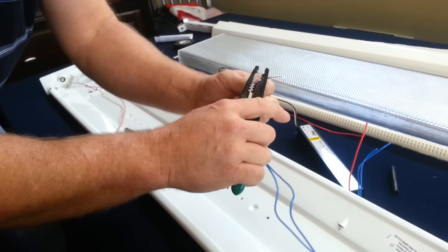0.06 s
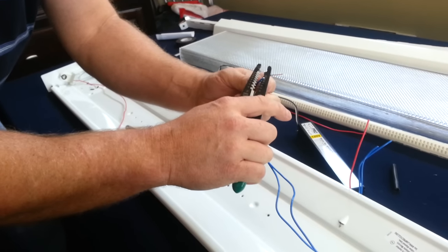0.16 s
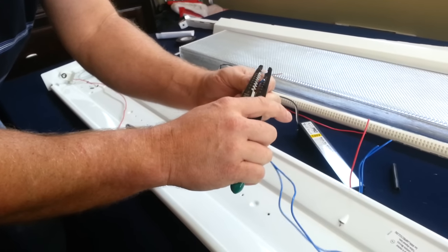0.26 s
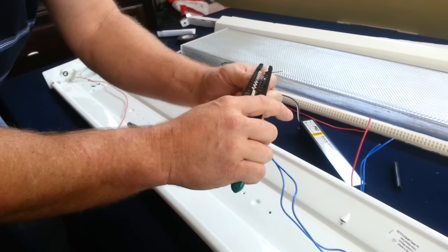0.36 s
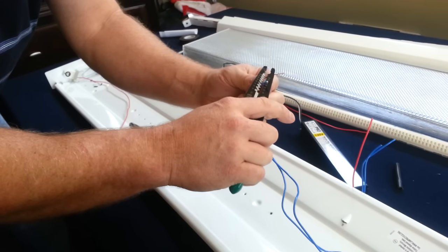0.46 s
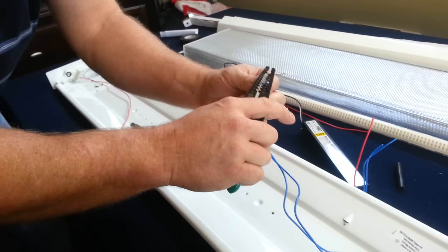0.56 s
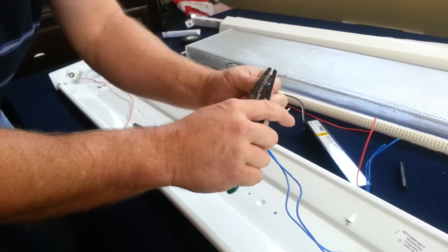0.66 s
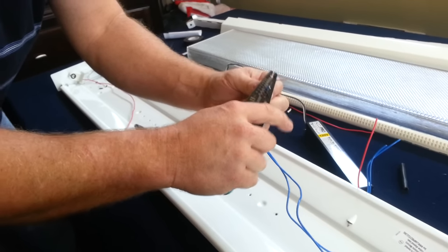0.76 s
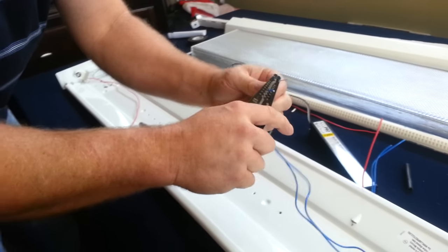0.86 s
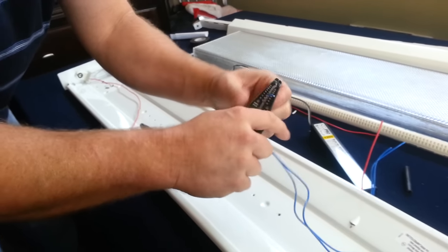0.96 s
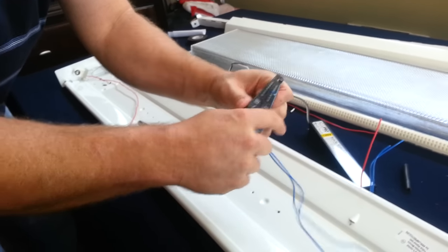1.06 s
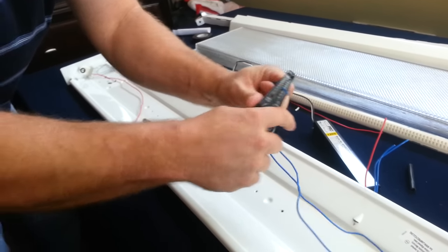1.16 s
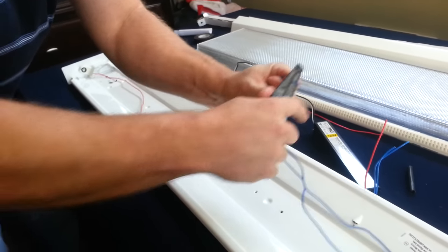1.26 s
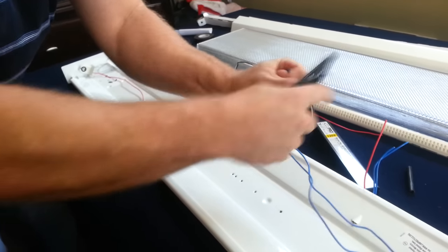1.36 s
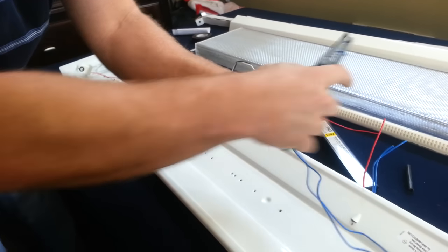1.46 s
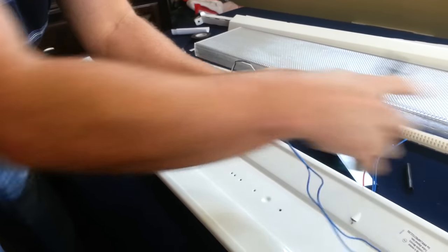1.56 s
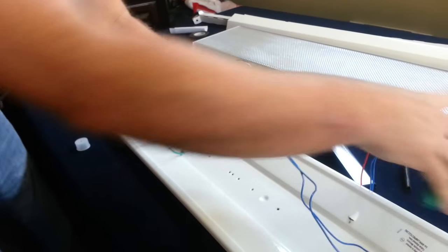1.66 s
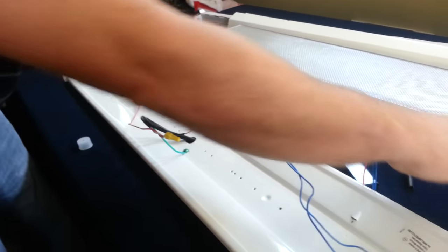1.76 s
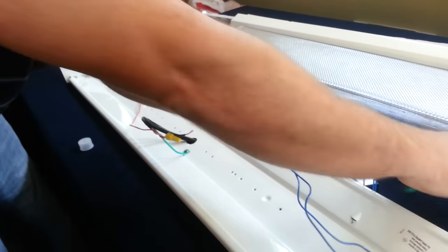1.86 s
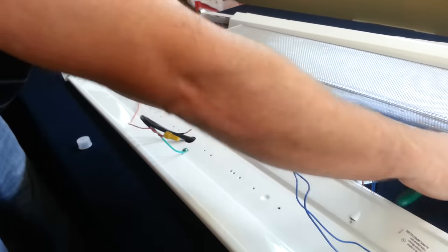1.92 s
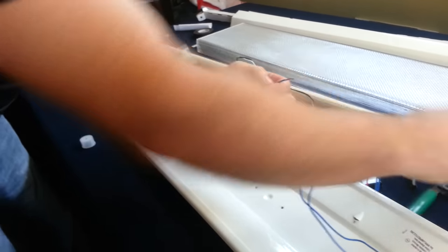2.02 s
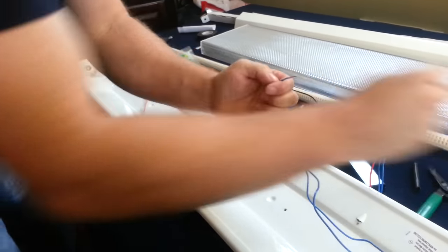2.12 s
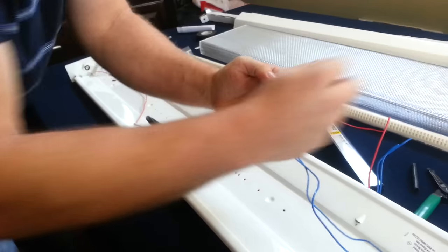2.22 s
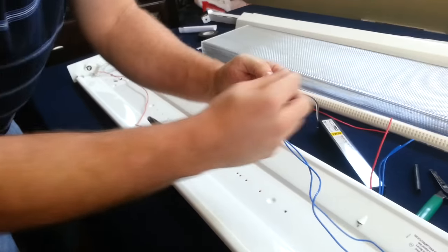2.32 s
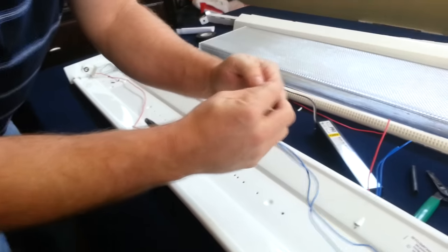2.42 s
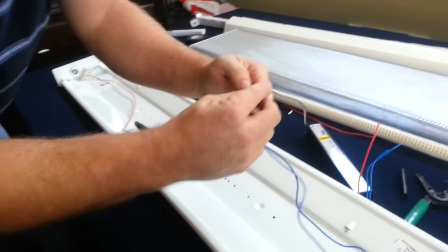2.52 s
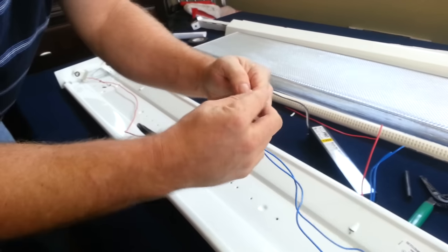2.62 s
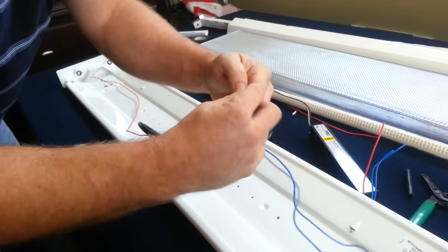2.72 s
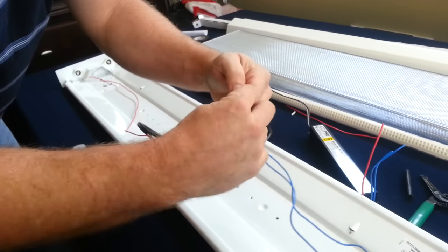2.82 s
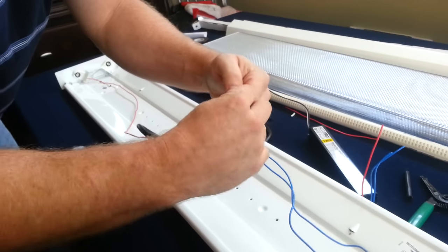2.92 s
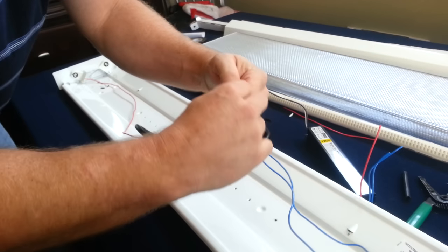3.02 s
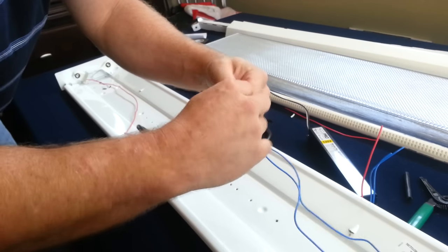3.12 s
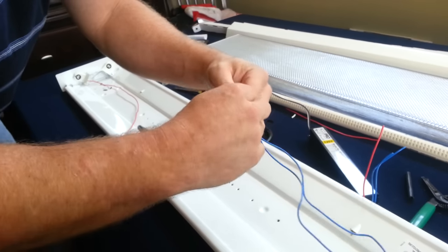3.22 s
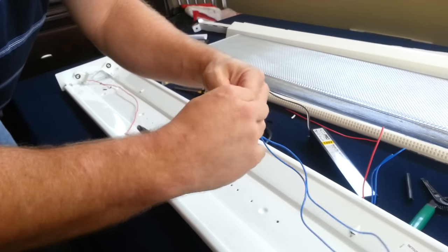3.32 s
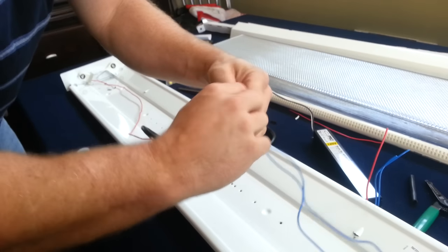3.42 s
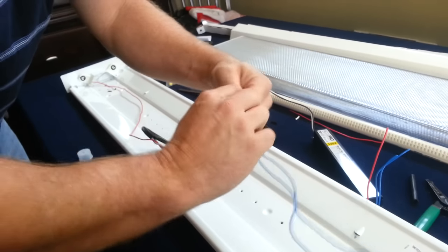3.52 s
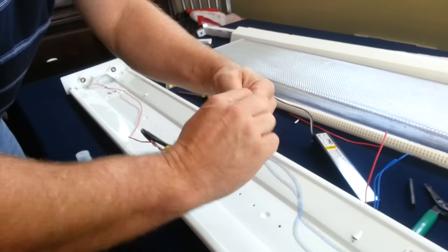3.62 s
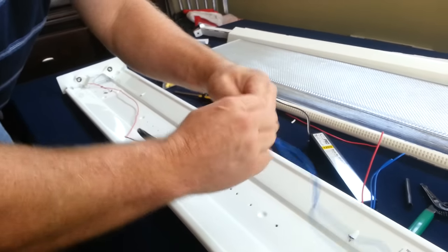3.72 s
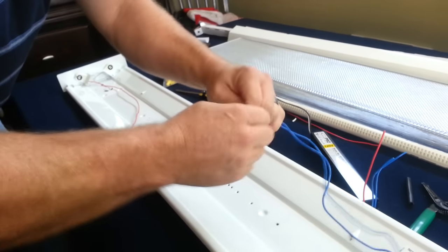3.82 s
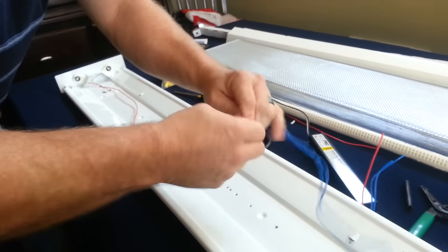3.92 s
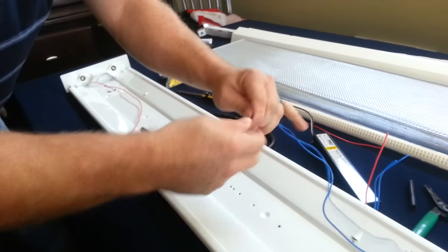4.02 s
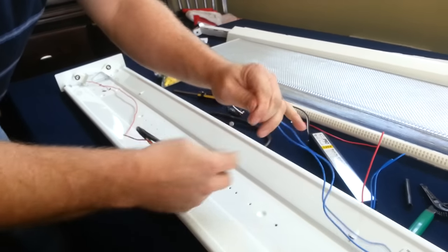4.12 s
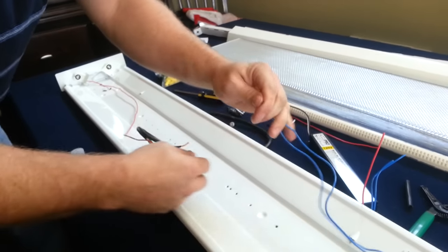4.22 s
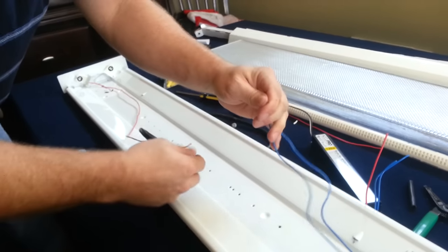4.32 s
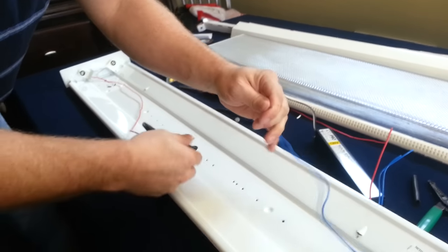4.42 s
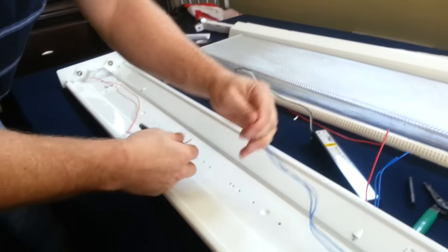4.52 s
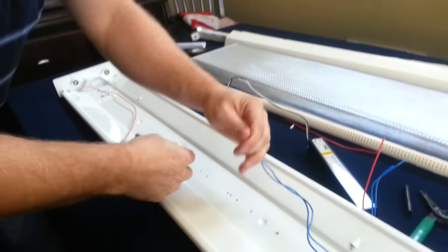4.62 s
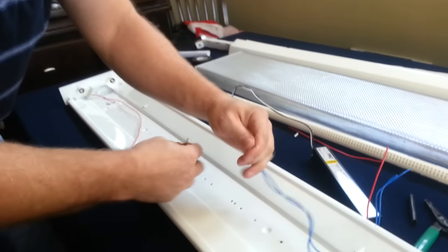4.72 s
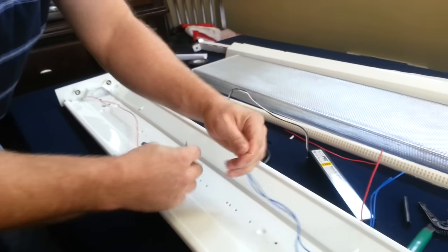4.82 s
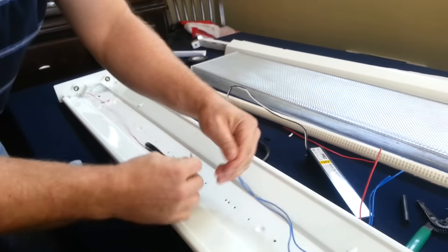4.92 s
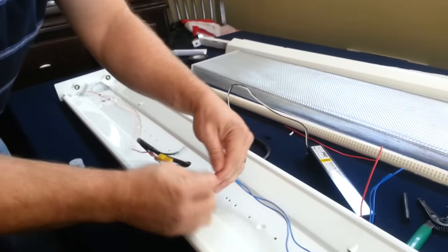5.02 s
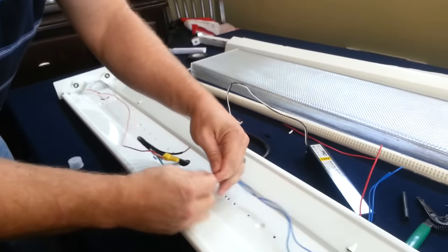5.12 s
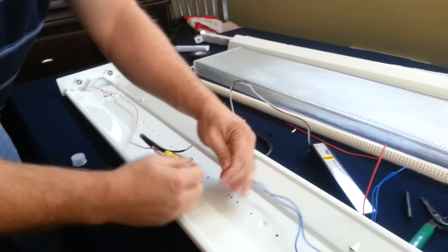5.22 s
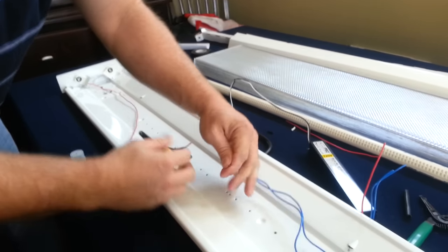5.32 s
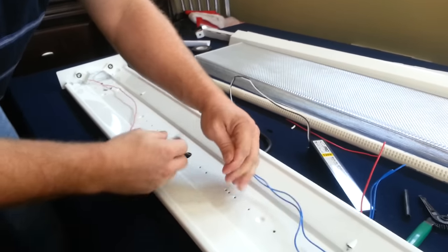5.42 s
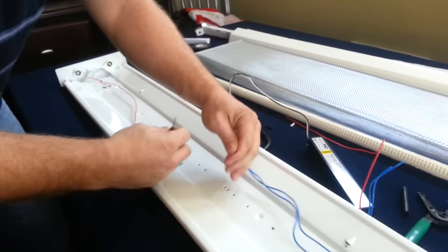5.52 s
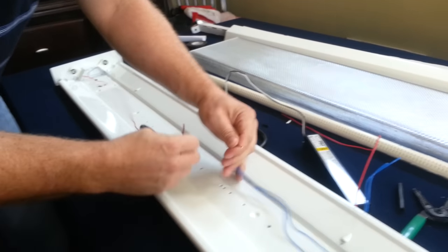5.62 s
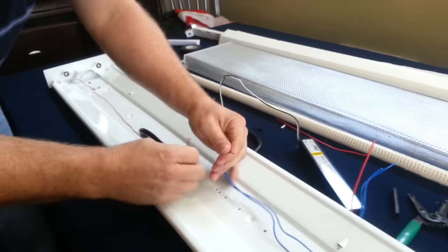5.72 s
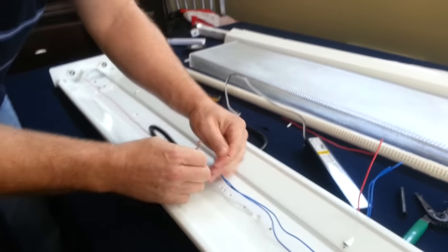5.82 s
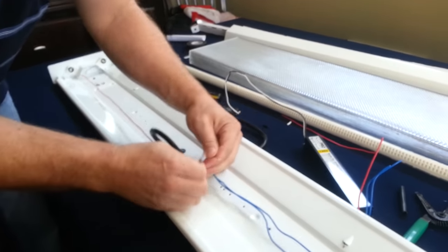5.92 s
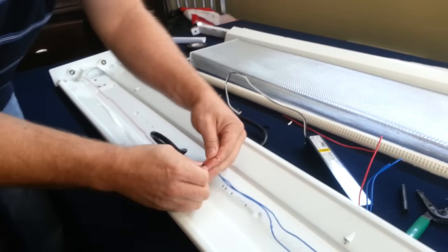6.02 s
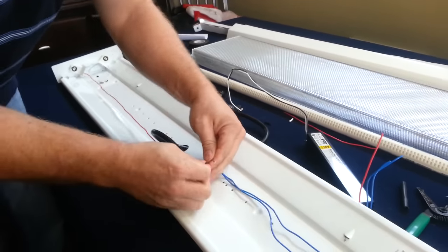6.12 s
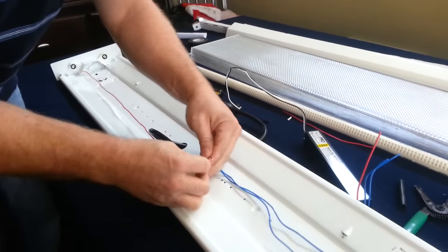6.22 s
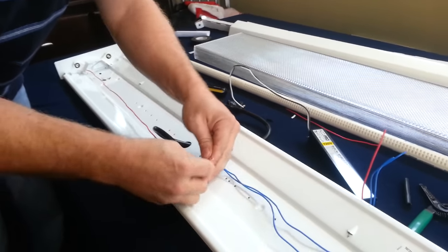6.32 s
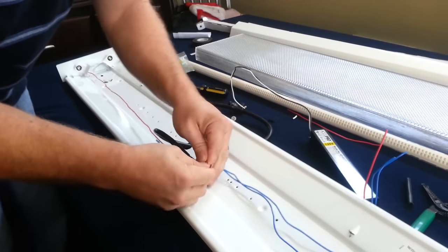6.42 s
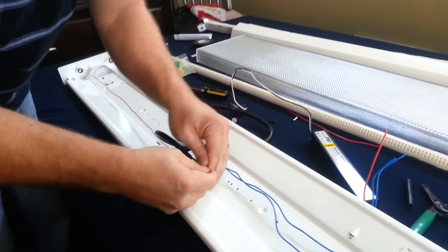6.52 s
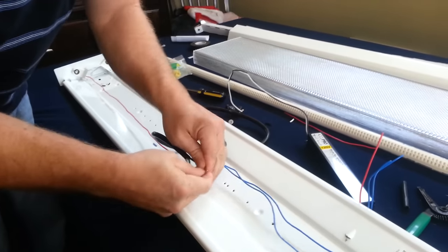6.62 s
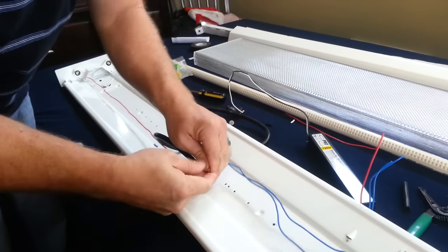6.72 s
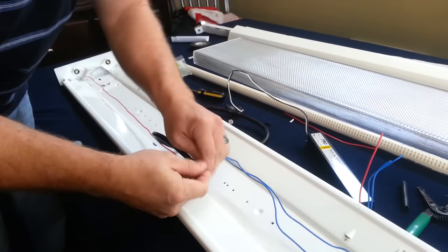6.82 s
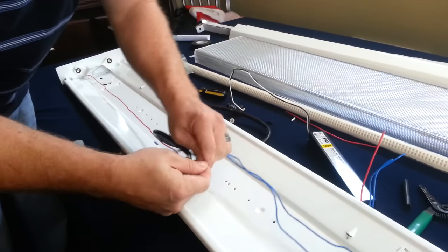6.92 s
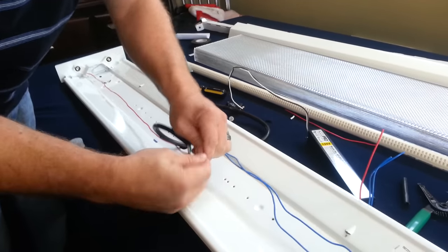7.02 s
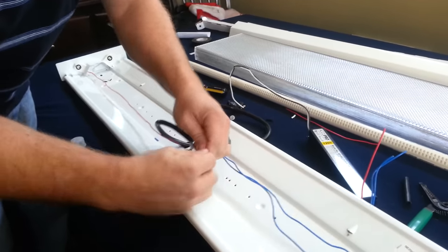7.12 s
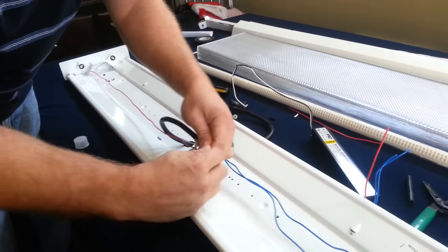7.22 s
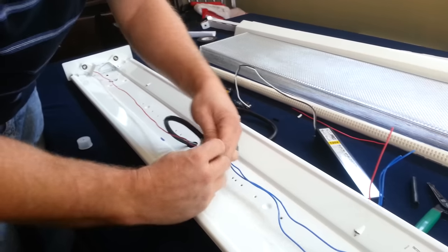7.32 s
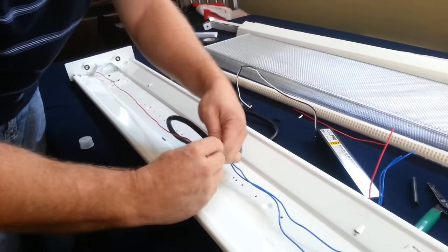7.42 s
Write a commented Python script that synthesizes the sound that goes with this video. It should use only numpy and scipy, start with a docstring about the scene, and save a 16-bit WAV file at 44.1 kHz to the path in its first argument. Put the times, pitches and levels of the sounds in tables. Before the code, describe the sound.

Wire strippers tick and snap, then drop with a loud ringing clang into a sheet-metal fixture, followed by wire taps and rustling hands in a quiet room.

```python
"""Wire taps and scuffs, in the hand during stripping, over room noise, a mains hum and rustling hands.
A steel wire stripper ticks and its jaws snap; it drops into an open sheet-metal light fixture, which rings.
Two faint thin whistles follow, one falling, one level and breathy; then wire taps and finger knocks on a plate.
Blows are a noise crack plus a banded noise ring; jaws and housing add decaying sine modes; fingers
drive a damped low resonance; whistles are gliding sines; rustle and room are shaped band noise."""
import sys
import numpy as np
from scipy import signal
from scipy.fft import rfft, irfft
from scipy.io import wavfile
from scipy.ndimage import uniform_filter1d

SR = 44100
rng = np.random.default_rng(int(sys.argv[2]) if len(sys.argv) > 2 else 0)


def write(x):
    x = np.atleast_2d(x).T
    wavfile.write(sys.argv[1], SR, np.round(np.clip(x, -1, 1) * 32767).astype(np.int16))

N = 329257  # samples

SIDES = np.array([[1], [-1]])  # left, right


def from_db(db):
    """Decibels to gain."""
    return 10 ** (np.asarray(db) / 20)


def rms_one(x):
    """Scale to rms 1."""
    return x / np.sqrt(np.mean(x ** 2) + 1e-20)


def at_hz(points, hz):
    """Interpolate a (f/Hz, value) table on a log-frequency axis."""
    table = np.array(points)
    return np.interp(np.log(hz), np.log(table[:, 0]), table[:, 1])


def drift(rate_hz):
    """Slow random wander of rms 1: twice-smoothed noise, computed at SR / 40."""
    r = np.exp(-80 * np.pi * rate_hz / SR)
    white = rng.standard_normal(N // 40 + 2002)
    slow = signal.lfilter([1], [1, -2 * r, r * r], white)[2000:]
    return np.interp(np.arange(N) / 40, np.arange(len(slow)), rms_one(slow))


def resonance(x, hz, width_hz):
    """Two-pole resonance, gain 1 on top."""
    r = np.exp(-np.pi * width_hz / SR)
    zeros = np.array([1, 0, -1]) * (1 - r * r) / 2
    poles = [1, -2 * r * np.cos(2 * np.pi * hz / SR), r * r]
    return signal.lfilter(zeros, poles, x)


# third-octave centres
BANDS_HZ = 26 * 2 ** (np.arange(28) / 3)


def noise_bank(size, likeness, balance, humps=(), lines_db=0):
    """Stereo noise in third-octave bands (bands x 2 x size), with spectral humps and a crowd of close lines."""
    hz = np.arange(size // 2 + 1) * SR / size
    crowd = uniform_filter1d(rng.standard_normal(len(hz)), size=max(1, 12 * size // SR))
    shape = from_db(lines_db * rms_one(crowd))
    for centre, width, db in humps:
        shape = shape * (1 + 1.37 * from_db(db) / (1 + (2 * (hz - centre) / width) ** 2))
    spectra = rfft(rng.standard_normal((2, 2, size))) * rms_one(shape)
    sources = irfft(spectra, size)
    bank = []
    for k, centre in enumerate(BANDS_HZ):
        edges = centre * 2 ** np.array([-1 / 6, 1 / 6])
        band_pass = signal.butter(2, edges, "band", fs=SR, output="sos")
        mid, side = signal.sosfilt(band_pass, sources[k % 2])  # neighbouring bands use different noise
        alike = np.clip(at_hz(likeness, centre), -1, 1)
        stereo = np.sqrt(1 + alike) * mid + np.sqrt(1 - alike) * side * SIDES
        bank.append(stereo * from_db(at_hz(balance, centre) / 2 * SIDES))
    return np.array(bank, dtype=np.float32)


def band_gains(colour, brightness_db=0, body_db=0):
    """Band gains for rms 1 before tilt; a hard contact tilts the treble up, a heavy one fills in the body."""
    gains = from_db(at_hz(colour, BANDS_HZ))
    total = np.sqrt(np.sum(gains ** 2 * BANDS_HZ) * .46 / SR)
    treble = brightness_db * np.log2(np.maximum(BANDS_HZ, 2500) / 4000)
    body = body_db / (1 + (BANDS_HZ / 2300) ** 4) / (1 + (480 / BANDS_HZ) ** 4)
    return gains / total * from_db(treble + body)


# ring decay: f/Hz, t60 / object's t60
DECAY_RATIO = [(100, 1.5), (400, 1.4), (1000, 1.25), (3000, 1.05), (6000, .84), (14000, .52)]
# a glancing scuff has more ring than crack and swells more slowly
SWELL_DB_PER_DB, USUAL_RING_DB = 0.9, -11


def blows(events, shared, colour, bank, crack_s, delay_s, spread_db, rattle_db):
    """Each blow: a short crack, then a dense, rattling ring that swells and dies band by band."""
    pan_db, favour_db, t60_s, swell_s = shared
    crack_len = 600
    size = int(np.clip(1.2 * t60_s, .05, 1) * SR)
    out = np.zeros((2, N + SR))
    t = np.arange(size, dtype=np.float32) / SR
    late = np.maximum(t - delay_s, 0)
    band_t60_s = t60_s * at_hz(DECAY_RATIO, BANDS_HZ)[:, None]
    dying = np.exp(-np.log(1000) / band_t60_s * late).astype(np.float32)
    edge = t[:crack_len] / crack_s
    crack_envelope = np.minimum(1, 4 * edge) * np.exp(-edge)
    chance = rng.standard_normal((len(events), len(BANDS_HZ) + 1))
    # loose parts chatter while the metal shakes
    rattle = np.append(from_db(rattle_db * drift(48)), np.ones(SR))

    for (s, peak_db, body_db, brightness_db, hz, ring_db), draw in zip(events, chance):
        at = round(s * SR)
        slower = from_db(SWELL_DB_PER_DB * max(ring_db - USUAL_RING_DB, 0))
        swell = 1 - np.exp(-late / (max(swell_s, 1e-4) * slower))
        gains = band_gains(colour, brightness_db, body_db) * from_db(spread_db * draw[1:])
        gains = gains.astype(np.float32)
        start = int(abs(draw[0]) * 1e6) % (bank.shape[2] - size)
        noise = bank[:, :, start:start + size]
        ring = np.einsum("bt,bct->ct", gains[:, None] * dying, noise)
        ring = from_db(ring_db) * swell * rattle[at:at + size] * ring
        # straight path: same crack wave in both ears
        crack = crack_envelope * (gains @ noise[:, 0, :crack_len])
        # the spot struck favours one group of modes
        width_hz = 0.055 * hz
        ring = ring + from_db(favour_db) * resonance(ring, hz, width_hz)
        crack = crack + from_db(favour_db) * resonance(crack, hz, width_hz)
        ring[:, :crack_len] += .7 * crack / np.abs(crack).max()
        out[:, at:at + size] += from_db(peak_db + pan_db / 2 * SIDES) * ring
    high_pass = signal.butter(4, 135, "high", fs=SR, output="sos")
    return signal.sosfilt(high_pass, out[:, :N] + 1e-18)


def rings(events, modes, modes_db, pan_db, lag_s):
    """Clear modes of a struck object: decaying sines, their phase delayed by lag_s in the left ear."""
    length_s = np.clip(max(mode[2] for mode in modes), .02, 1.5)
    t = np.arange(int(length_s * SR)) / SR
    out = np.zeros((2, N + 2 * SR))
    hz, level_db, t60_s = np.transpose(modes)[:, :, None]
    fading = from_db(level_db + modes_db - 60 * t / t60_s) * np.minimum(1, t / .0004)
    tones = [np.sum(fading * np.sin(2 * np.pi * hz * (t - lag)), 0) for lag in (lag_s, 0)]
    for s, peak_db, *_ in events:
        out[:, round(s * SR):][:, :len(t)] += from_db(peak_db + pan_db / 2 * SIDES) * tones
    return out[:, :N]


# air, left-right likeness: f/Hz, correlation
AIR_LIKENESS = [(60, 0.49), (180, 0.29), (540, 0.58), (1610, -0.1), (4820, -0.023), (14400, -0.046)]
# air, left over right: f/Hz, level/dB
AIR_BALANCE = [(60, 0), (240, 1), (930, -3.5), (3670, 2.5), (14400, -3)]
# faint steady band in the hiss: f/Hz, width/Hz, level/dB (before a 1.37 gain)
WHINE = [(8030, 420, -3)]


def air_noise():
    """Diffuse room noise bands, shared by room tone, rustle and dry blows."""
    return noise_bank(N, AIR_LIKENESS, AIR_BALANCE, WHINE, lines_db=2.5)


# murmur and hiss spectrum: f/Hz, level/dB per Hz (relative)
ROOM_COLOUR = [(15, -44), (25, -24), (59, -17), (109, -8.5), (162, -5), (243, 3), (353, -1), (473, 5.5),
               (766, -6.5), (1080, -2.5), (1850, -13), (3910, -31), (6500, -22), (13700, -19.5),
               (14900, -30)]
ROOM_DB = -58
# mains hum: f/Hz, level/dB (mean rms before stereo balance)
HUM = [(118.4, -72.5)]


def room_tone(bank):
    """Ventilation murmur and microphone hiss as band noise, with a wavering mains-hum sine."""
    murmur = np.einsum("b,bct->ct", band_gains(ROOM_COLOUR), bank) * from_db(ROOM_DB)
    t = np.arange(N) / SR
    hum = np.zeros(N)
    for hz, db in HUM:
        hum += np.sqrt(2) * from_db(db + .7 * drift(3)) * np.sin(2 * np.pi * hz * t)
    return murmur + hum * from_db(1.2 * SIDES)


# skin, insulation and dragged wire: t/s, level/dB
RUSTLE_LEVEL = [(0.0, -47), (0.4, -63.5), (0.65, -59.5), (0.95, -57), (1.68, -60), (2.4, -57),
                (2.62, -62.5), (2.77, -58.5), (2.95, -65), (3.8, -58.5), (4.06, -55), (4.3, -63.5),
                (4.43, -64), (4.5, -41.5), (4.85, -51.5), (6.2, -55.5), (7.06, -57.5), (7.46, -62.5)]
# friction spectrum: f/Hz, level/dB per Hz (relative)
RUSTLE_COLOUR = [(710, -9), (1200, 3.5), (1850, -6), (2010, -2), (3030, -3), (4670, -2.5), (5590, -10.5),
                 (14000, -17), (14900, -23)]


def rustle(bank):
    """Friction under moving hands: upper-band noise in grains and patches, partly common to all bands."""
    level_db = np.interp(np.arange(N) / SR, *np.transpose(RUSTLE_LEVEL))
    together = drift(25)
    hiss = np.zeros((2, N))
    for gain, band in zip(band_gains(RUSTLE_COLOUR)[15:], bank[15:]):
        grain = from_db(1.1 * together + 0.75 * drift(12))
        hiss += gain * grain * band[:, ::-1]  # noise read backwards in time
    return from_db(level_db + 0.37 * SIDES) * hiss


# wire taps and scuffs, up to 1.2 s in the hand during stripping, later ones on the plate:
# t/s, level/dB, body/dB, brightness/dB, favoured f/Hz, ring/dB
TAPS = [(0.0014, -26, -7, -1, 3000, -13), (0.0572, -24.5, -3.5, 0, 4650, -13),
        (0.1329, -33, -3, -1.5, 3770, -7.5), (0.1759, -31, -1, -1.5, 3800, -9),
        (0.2228, -30, -6, -4, 4820, -13), (0.2817, -38.5, 0.5, -0.5, 4860, -6),
        (0.2988, -39, 4, 5.5, 4820, -17.5), (0.4886, -42, -4, -2, 4850, -10),
        (0.5165, -37, -5, 0, 4830, -11), (0.5656, -47.5, 4, 3.5, 3930, -1),
        (0.8972, -40, -14, -14, 2220, -5), (1.01, -38, -1, 0, 3500, -13.5), (1.140, -41, -9, 0, 3140, -9),
        (1.1502, -36.5, -1.5, -14.5, 2720, -9), (3.2267, -43.5, 3, -0.5, 7000, -11.5),
        (3.7637, -38.5, 2, 0, 5360, -11), (3.911, -31, -5, -3, 6030, -11.5),
        (3.926, -39.5, -4.5, -21, 3500, -9.5), (4.4324, -18.5, -4.5, -2, 1420, -7),
        (4.5509, -29, -9, -6.5, 4130, -2.5), (4.612, -18, -3, 0, 4000, -9.5),
        (4.7183, -17, -3.5, -0.5, 4070, -12.5), (4.7392, -25, 5, -4, 4470, -14),
        (4.8346, -33, -2, -6, 1280, -15), (5.0834, -7, 2.5, 2, 1510, -11.5),
        (5.0961, -9, 0.5, -2.5, 4500, -14), (5.2125, -17, 2.5, 2.5, 1780, -6.5),
        (5.2235, -8.5, 4.5, 0.5, 1270, -13), (5.3612, -16, 5.5, 1, 4430, -18),
        (5.462, -14, 2, 0, 4140, -9.5), (5.6644, -37, -1.5, -5.5, 3580, -2),
        (5.8251, -40, -4, -11, 1780, -8), (5.9822, -33.5, -4, -4.5, 4200, -4),
        (6.062, -31.5, 0.5, -6, 3800, -4), (6.119, -25, 6.5, 1.5, 4300, -10),
        (6.304, -30, -2.5, -6, 4730, -11.5), (6.4793, -27.5, -14, -5.5, 4140, -11.5),
        (6.5292, -34, -5, -9, 4390, -12), (6.6178, -43.5, 0, 0, 1110, -12),
        (6.878, -51.5, 1, -1.5, 4000, 0), (7.055, -44, 3, -8, 3870, -3.5)]
# mode humps: f/Hz, width/Hz, level/dB (before a 1.37 gain)
TAP_HUMPS = [(1385, 18, -5), (1776, 44, 0), (3186, 29, 7), (3915, 28, -5), (4100, 32, -0.5),
             (4460, 290, -13), (5100, 40, -5), (6130, 21, -18)]
# tap spectrum: f/Hz, level/dB per Hz (relative)
TAP_COLOUR = [(180, -23.5), (300, -16), (416, -10.5), (749, -13.5), (941, -2), (1490, -3), (1810, -5.5),
              (2900, -2), (4450, 5), (5900, 2.5), (8970, -0.5), (10100, -10), (13700, -6), (14900, -20)]
# left-right likeness: f/Hz, correlation
TAP_LIKENESS = [(60, 0.26), (180, 0.61), (540, 0.74), (1610, 0.13), (4820, -0.22), (14400, 0.3)]
# left over right: f/Hz, level/dB
TAP_BALANCE = [(60, 7), (180, -5.5), (540, -3), (1610, -3.5), (4820, -1), (14400, -15.5)]
# shared by all taps: left over right/dB, favoured-mode lift/dB, base t60/s, base swell/s
TAP_RING = (4.3, 1.3, .36, 0.0015)


def wire_taps():
    """Wire taps and scuffs, in the hand or on the plate: all excite one set of dense noise modes."""
    modes = noise_bank(2 * SR, TAP_LIKENESS, TAP_BALANCE, TAP_HUMPS, lines_db=4.5)
    return blows(TAPS, TAP_RING, TAP_COLOUR, modes,
                 crack_s=0.0014, delay_s=0.00017, spread_db=1.1, rattle_db=1.5)


# dry wire-on-steel ticks: t/s, level/dB, body/dB, brightness/dB, favoured f/Hz, ring/dB
TICKS = [(0.2225, -24.5, -13, -4, 4800, -18), (0.8676, -41, 0, -6, 3970, -14),
         (0.8974, -32, -4, 0, 3520, -19.5), (1.15, -21.5, -10, -4.5, 6300, -19.5),
         (1.315, -30.5, -17, 3.5, 7800, -31), (1.326, -35, -15, -1, 4750, -27),
         (1.3548, -29, -9, 10, 4940, -38), (1.3835, -27, 10, -8, 2510, -28),
         (1.5248, -28.5, 5, -4, 4110, -26), (1.5687, -32, 0, -6, 4410, -20),
         (1.580, -32, -6, -11, 5000, -25), (1.612, -36.5, -6, 1, 4360, -24),
         (3.111, -36, -5, -25, 2780, -29.5), (3.7973, -15.5, -8, -3.5, 3100, -26),
         (4.8834, -32, -2, -5, 5030, -18), (5.026, -26.5, 3, -2, 8510, -21),
         (5.051, -33, -5, -8, 5660, -16), (6.349, -30.5, 11, -2, 1140, -20.5),
         (6.5392, -28.5, 0, 0, 4520, -26.5), (7.147, -26, -1, -8.5, 4620, -24.5)]
# jaw snaps: t/s, level/dB, body/dB, brightness/dB, favoured f/Hz, ring/dB
CLICKS = [(0.9843, -30.5, -16, -7, 4530, -13), (1.3702, -10.5, 6.5, 0.5, 4950, -26)]
# jaw modes: f/Hz, level/dB (relative), t60/s
JAW_MODES = [(2920, -6, 0.012), (4800, 1, 0.0079), (7400, 0, 0.0093), (8800, -16, 0.018),
             (10400, -31, 0.012)]
# steel contact spectrum: f/Hz, level/dB per Hz (relative)
JAWS_COLOUR = [(180, -36), (300, -10), (800, -12), (1150, -13), (2910, -4.5), (3840, -2.5), (6370, -5),
               (7620, -3), (13100, -6), (14900, -26)]
# shared by all: left over right/dB, favoured-mode lift/dB, base t60/s, base swell/s
DRY_RING = (2, 3.1, .32, 0.0032)


def jaw_clicks(air):
    """Dry ticks and jaw snaps answered by the room's diffuse ring; snaps also ring the jaw modes."""
    contacts = blows(CLICKS + TICKS, DRY_RING, JAWS_COLOUR, air,
                     crack_s=0.0012, delay_s=0.0025, spread_db=2.0, rattle_db=1.64)
    return contacts + rings(CLICKS, JAW_MODES, modes_db=-5, pan_db=8.0, lag_s=.00003)


# tool grazes, lands nose down, bounces: t/s, level/dB, body/dB, brightness/dB, favoured f/Hz, ring/dB
DROP = [(1.9565, -21.5, 2.5, -10.5, 900, -12), (1.961, 0.5, -3.5, 3, 4900, -9),
        (1.977, 2.5, -4.5, 0, 4100, -18.5), (2.029, -10, -1.5, -2.5, 3980, -13)]
# clear housing modes: f/Hz, level/dB (relative), t60/s
HOUSING_MODES = [(239, -12, 1), (323, -17, 1.4), (434, -5.5, .5), (707, -11.5, 1.97), (885, -7.5, 1.07),
                 (980, -1, 0.78), (975, -3.5, 0.73), (1100, -12, 1.1), (1270, -8, .4), (1367, -11, 1.1),
                 (1498, -6, 0.79), (1687, -1, 0.34), (1780, -9.5, 0.37), (1940, -6.5, .33),
                 (2070, 2.5, 0.39), (2185, -6, 0.43), (2510, -7, .45), (2850, -8.5, 0.4),
                 (3100, -10.5, .35), (3720, -7, .35), (3940, -6, .35), (3950, -7.5, .35), (4911, -9, .3),
                 (7100, -16, .25), (7300, -10.5, .25)]
# housing mode humps: f/Hz, width/Hz, level/dB (before a 1.37 gain)
HOUSING_HUMPS = [(960, 58, 7), (1690, 110, -5.5), (2210, 29, 1.5), (2460, 16, -9), (2930, 340, -4),
                 (3320, 110, -19), (3900, 110, -5), (3860, 38, -5.5), (4770, 22, -5), (4950, 26, -6),
                 (5240, 87, -0.5), (7240, 27, -15), (7350, 31, -4), (7890, 26, -10)]
# housing spectrum: f/Hz, level/dB per Hz (relative)
HOUSING_COLOUR = [(47, -83), (95, -46.5), (168, -11.5), (255, -14.5), (431, -5.5), (744, -13), (968, -2.5),
                  (1200, -6.5), (1750, -4), (2370, -9.5), (4010, -6.5), (5690, -15), (7900, -19),
                  (14900, -41.5)]
# left-right likeness: f/Hz, correlation (clipped to +-1)
HOUSING_LIKENESS = [(60, 0.25), (180, 1), (540, 0.48), (1610, -0.27), (4820, -0.12), (14400, 0.9)]
# left over right: f/Hz, level/dB
HOUSING_BALANCE = [(60, 0.5), (180, 0), (540, -1.5), (1610, -2), (4820, 0.5), (14400, -8.5)]
# shared by all: left over right/dB, favoured-mode lift/dB, base t60/s, base swell/s (floored at 1e-4)
HOUSING_RING = (2.4, -2, 0.51, -0.0033)


def tool_drop():
    """The tool hits sheet metal: dense noise rings, plus clear sine modes from the nose-down blow."""
    housing = noise_bank(2 * SR, HOUSING_LIKENESS, HOUSING_BALANCE, HOUSING_HUMPS, lines_db=2.5)
    drop = blows(DROP, HOUSING_RING, HOUSING_COLOUR, housing,
                 crack_s=0.002, delay_s=.0002, spread_db=1.3, rattle_db=1.34)
    return drop + rings(DROP[1:2], HOUSING_MODES, modes_db=-21, pan_db=1.0, lag_s=.0001)


# faint thin whistles, one falling, one level and breathy:
# t/s, length/s, level/dB, start f/Hz, end f/Hz, breadth/Hz
WHISTLES = [(2.269, .12, -54.5, 3240, 2800, 10), (2.67, 0.18, -61, 2870, 2860, 113)]


def whistles():
    """A tone that swells, bends ever faster towards its end pitch and fades; breadth makes it breathy."""
    out = np.zeros(N)
    for s, length_s, db, start_hz, end_hz, breadth_hz in WHISTLES:
        gone = np.linspace(0, 1, int(length_s * SR))
        at = slice(round(s * SR), round(s * SR) + len(gone))
        hz = start_hz + (end_hz - start_hz) * gone ** 1.3 + breadth_hz * drift(450)[at]
        envelope = np.sin(np.pi * gone) ** 0.68 * from_db(1.5 * drift(40)[at])
        tone = np.sin(2 * np.pi * np.cumsum(hz) / SR)
        out[at] = np.sqrt(2) * from_db(db) * envelope * tone
    return out


# fingers knock and rub the plate: t/s, peak level/dB, f/Hz, contact/s
KNOCKS = [(4.805, -33.5, 373, 0.0055), (5.658, -37, 375, 0.054), (5.685, -34.5, 330, 0.066),
          (5.771, -40, 350, .03), (6.155, -39.5, 320, 0.037)]


def finger_knocks():
    """A fingertip is soft: its uneven contact drives only a low, damped flexing of the plate."""
    out = np.zeros(N + SR)
    t = np.arange(SR // 4) / SR
    noises = rng.standard_normal((len(KNOCKS), len(t)))
    for (s, peak_db, hz, contact_s), noise in zip(KNOCKS, noises):
        push = noise * t / contact_s * np.exp(-3 * t / contact_s)
        flex = resonance(resonance(push, hz, 230), hz, 240)
        out[round(s * SR):][:len(t)] += from_db(peak_db) * flex / np.abs(flex).max()
    return out[:N]


def scene():
    """Sum all sources, left and right."""
    air = air_noise()
    background = room_tone(air) + rustle(air)
    strikes = wire_taps() + jaw_clicks(air) + tool_drop()
    return background + strikes + whistles() + finger_knocks()


CUTOFF_HZ = 15000


def record(dry):
    """Clip at full scale, then cut the top with a steep low-pass."""
    low_pass = signal.cheby2(12, 60, CUTOFF_HZ * 1.03, fs=SR, output="sos")  # stopband edge, -60 dB
    return signal.sosfilt(low_pass, np.clip(dry, -1, 1))


dry = scene()
out = record(dry)
write(out)
```